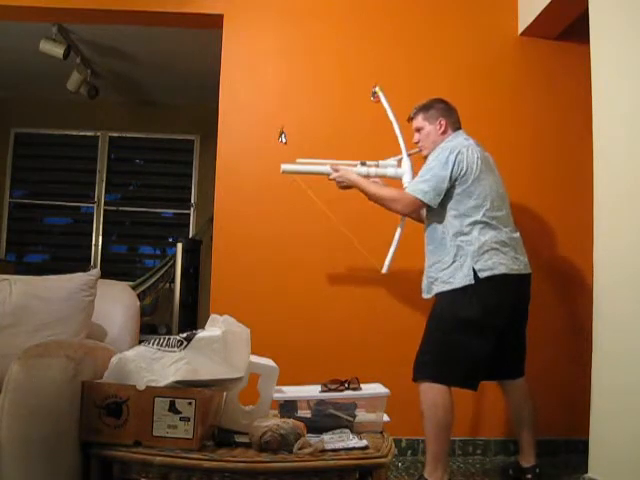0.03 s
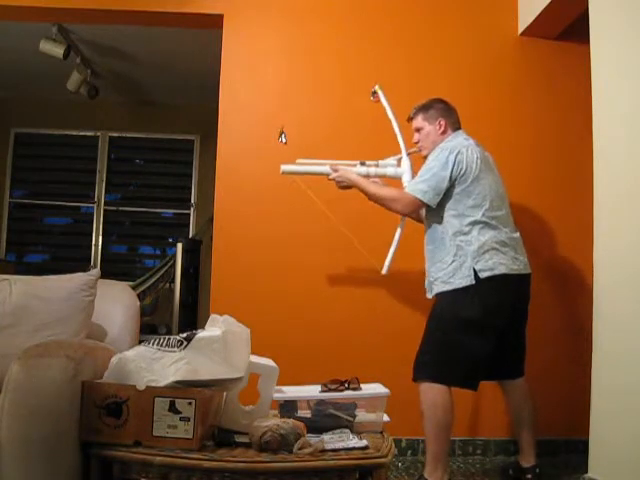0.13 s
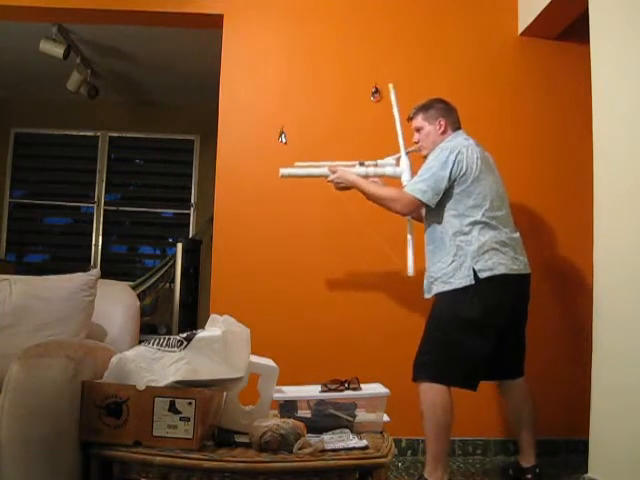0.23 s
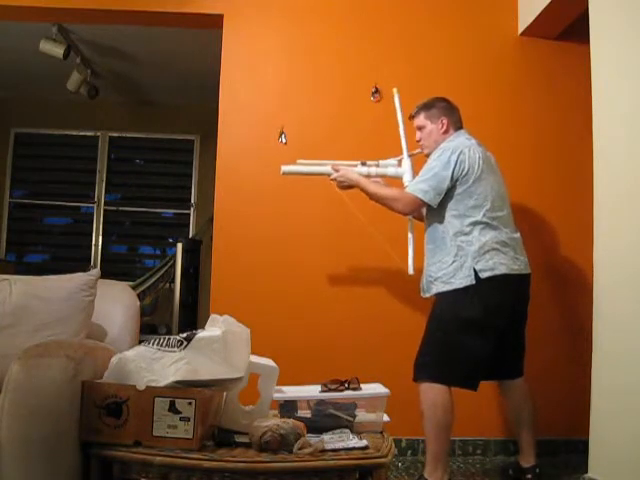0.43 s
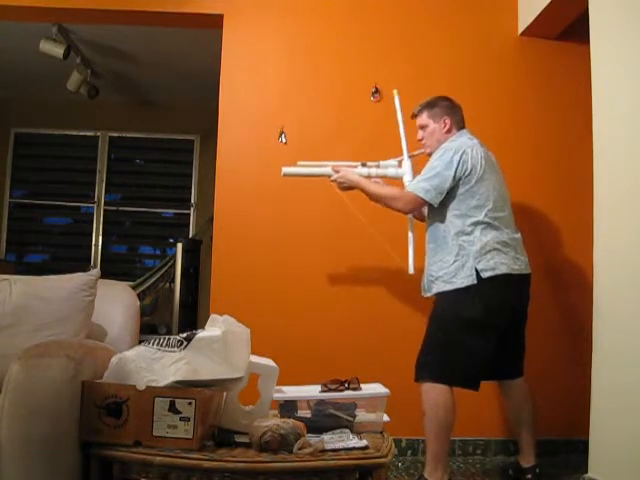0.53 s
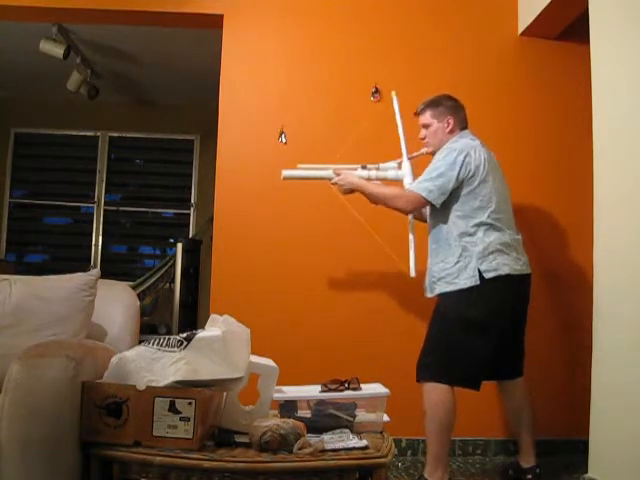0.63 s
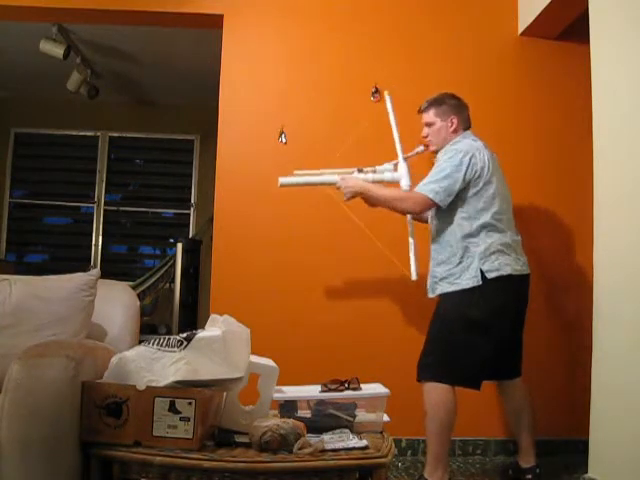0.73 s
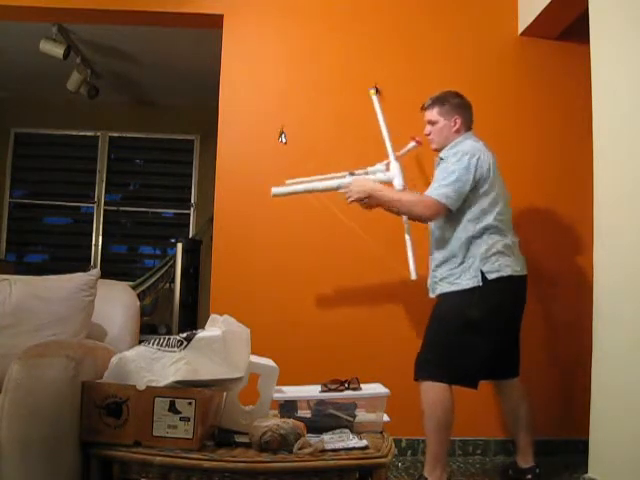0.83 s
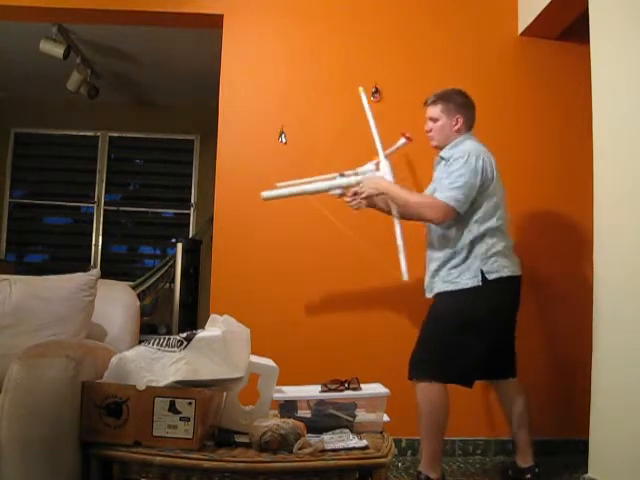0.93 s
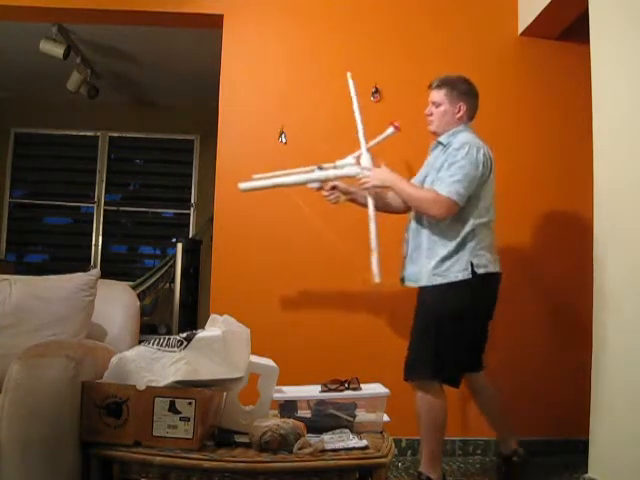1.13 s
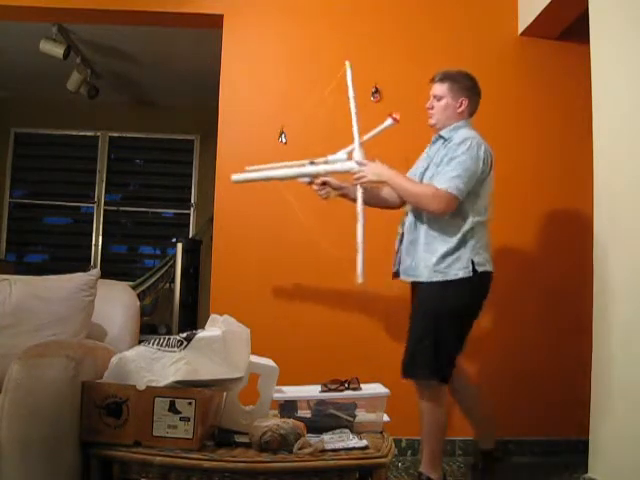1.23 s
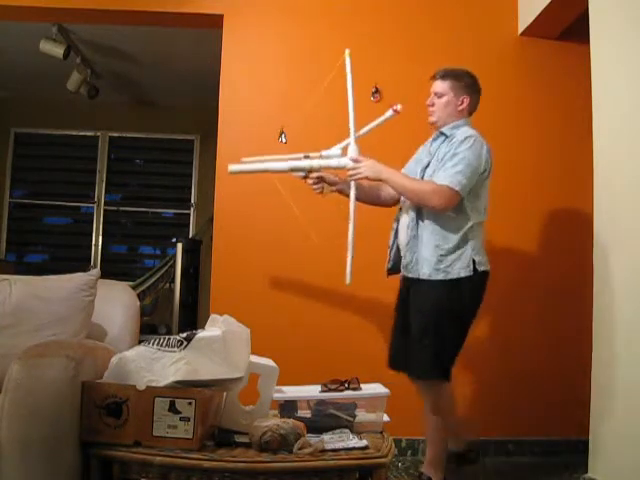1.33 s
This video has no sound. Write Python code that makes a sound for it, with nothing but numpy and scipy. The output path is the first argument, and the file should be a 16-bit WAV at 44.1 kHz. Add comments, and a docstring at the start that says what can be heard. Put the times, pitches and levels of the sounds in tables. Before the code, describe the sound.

A home-made plastic-pipe crossbow creaks, then fires with a loud snapping thump. The dart cracks against a nearby surface and drops with light taps, and sleeves rustle faintly in a slightly echoing living room.

```python
"""A short creak comes first, as a finger squeezes the trigger of a home-made plastic-pipe crossbow.
The catch lets go, the bow's limbs thump the air, and the plunger slams home and rings the frame.
The dart cracks against a nearby surface in the hard-walled living room, then drops with light taps.
Sleeves rustle as the bow is lowered. The recorder turns itself down at the shot and creeps back up
over a low hum and a thin whine."""
import sys
import numpy as np
from scipy import signal
from scipy.fft import rfft, irfft
from scipy.io import wavfile
from scipy.ndimage import uniform_filter1d

SR = 44100
rng = np.random.default_rng(int(sys.argv[2]) if len(sys.argv) > 2 else 0)


def int16_out(signal):
    """Quantize to a 16-bit WAV file."""
    q = np.round(np.clip(np.atleast_2d(signal).T, -1, 1) * 32767)
    wavfile.write(sys.argv[1], SR, q.astype(np.int16))


N = 61739
TIME = np.arange(N) / SR


def gain(db):
    """Turn decibels into a multiplier."""
    return 10 ** (np.asarray(db) / 20)


def unit(x):
    """Scale a sound to an average (rms) level of 1."""
    return x / np.sqrt(np.mean(x ** 2))


def with_energy(x, db):
    """Give a short sound the energy of 0.01 seconds of steady sound at db."""
    return x * gain(db) * np.sqrt(.01 * SR / np.sum(x ** 2))


def fade(start, fade_s):
    """Die away from a start time. A fade time is how long it takes to drop 60 dB."""
    age = TIME - start
    return (age >= 0) * np.exp(-np.log(1000) * np.maximum(age, 0) / fade_s)


def ring(start, hz, fade_s):
    """One fading note."""
    return fade(start, fade_s) * np.sin(2 * np.pi * hz * (TIME - start))


def wobble(samples):
    """A random wander, slower when smoothed over more samples."""
    return unit(uniform_filter1d(rng.standard_normal(N), size=samples))


def at_hz(hz, table):
    """Read between the rows of a table of frequencies and values."""
    freqs, values = np.array(table, float).T
    return np.interp(np.log(hz + 1), np.log(freqs), values)


def shape_tone(x, tone):
    """Make some frequencies louder and others softer, following a tone table."""
    hz = np.arange(N + 1) * SR / (2 * N)
    cepstrum = irfft(np.log(gain(at_hz(hz, tone))))
    cepstrum[1:N] *= 2
    cepstrum[N + 1:] = 0  # so the filter rings only after a hit, never before
    return irfft(rfft(x, 2 * N) * np.exp(rfft(cepstrum)))[:N]


# How long the room rings. Each row: frequency in Hz, fade time in seconds.
ROOM_FADES = [(100, .25), (250, 0.37), (550, 0.52), (1400, 0.62), (3500, 0.67), (8000, 0.51), (14000, .43)]
def room_tail(start, build_s=0.0039, bands=16):
    """Wall echoes blur into a wash of noise, each frequency band fading at its own rate."""
    hz = np.arange(N // 2 + 1) * SR / N
    centres = np.geomspace(ROOM_FADES[0][0], ROOM_FADES[-1][0], bands)
    noise = np.exp(2j * np.pi * rng.random(len(hz)))
    tail = 0
    for centre, share in zip(centres, np.eye(bands)):
        band = irfft(noise * np.interp(hz, centres, share), N)
        tail += band * fade(start, at_hz(centre, ROOM_FADES))
    return tail * (1 - np.exp(-np.maximum(TIME - start, 0) / build_s))


def contact(start, db, fade_s, room_db):
    """One hit: a burst of noise and the room's answer, which builds more slowly for a longer burst."""
    burst = rng.standard_normal(N) * fade(start, fade_s)
    tail = room_tail(start, build_s=0.0039 + fade_s / np.log(1000))
    return with_energy(burst, db) + with_energy(tail, db + room_db)


def knocks(rows, tone, room_db):
    """Hits take on the tone of the part that is struck, keeping their energy."""
    hits = sum(contact(start, db, fade_s, room_db) for start, db, fade_s in rows)
    return unit(shape_tone(hits, tone)) * np.std(hits)


# Tiny knocks in the frame. Each row: start in seconds, level in dB, fade time in seconds.
CREAK_HITS = [(0.0, -34.5, .15), (0.0235, -36.5, 0.073), (0.0295, -34, 0.049), (0.047, -39.5, 0.085)]
# Their tone. Each row: frequency in Hz, boost or cut in dB.
CREAK_TONE = [(120, -53.5), (200, -21), (397, -8.5), (512, -35.5), (696, -6), (833, -3.5), (998, -11),
              (1200, -1.5), (1950, -9.5), (2130, -11.5), (2850, -8), (5450, -7), (15000, -28)]
def creak():
    """The drawn frame creaks under the trigger finger."""
    return knocks(CREAK_HITS, CREAK_TONE, room_db=-2.5)


# The tone of the room's air. Each row: frequency in Hz, boost or cut in dB.
AIR_TONE = [(15, -32.5), (25, -4), (305, -9.5), (368, -6.5), (523, -12.5), (582, -9), (782, -15.5),
            (1140, -16.5), (3340, -27.5), (4870, -24), (5280, -33.5), (15500, -41.5)]
def air_and_hum(air_db=-54.5, hum_hz=59, hum_db=-61):
    """Soft room noise and mains hum go on throughout."""
    air = unit(shape_tone(rng.standard_normal(N), AIR_TONE))
    return gain(air_db) * air + gain(hum_db) * np.sin(2 * np.pi * hum_hz * TIME)


# Small taps. Each row: start in seconds, level in dB, pitch in Hz, half the filter's width in Hz,
# fade time in seconds.
TAPS = [(0.0241, -41.5, 740, 183, 0.017), (0.571, -45, 614, 300, .03), (0.678, -34.5, 927, 496, 0.094),
        (0.681, -36.5, 3950, 1650, 0.028), (0.684, -43, 367, 248, 0.17), (0.693, -43.5, 8600, 1990, 0.015),
        (0.714, -41.5, 1280, 1220, 0.071), (0.787, -52, 11040, 1200, 0.037),
        (0.9658, -47.5, 6800, 3660, 0.0025)]
def light_taps():
    """The trigger, and later the dropping dart and loose parts, tap with a rough pitch each."""
    taps = 0
    for start, db, hz, half_width, fade_s in TAPS:
        tap = contact(start, db, fade_s, room_db=0.5)
        b, a = signal.iirpeak(hz, hz / (2 * half_width), fs=SR)
        pitched = signal.lfilter(b, a, signal.lfilter(b, a, tap))
        taps += unit(pitched) * np.std(tap)
    return taps


# When the whine sounds. Each row: start in seconds, length in seconds, level in dB.
WHINE_SPELLS = [(0.029, 0.14, -57), (1.27, 0.2, -64)]
def whine(hz=4770, waver_hz=37.4, edge_s=0.016):
    """A thin, high, wavering note, perhaps an insect outside."""
    loudness = 0
    for start, length, db in WHINE_SPELLS:
        inside_s = np.minimum(TIME - start, start + length - TIME)
        loudness += gain(db) * np.clip(inside_s / edge_s, 0, 1)
    pitch = hz + waver_hz * wobble(200)
    return loudness * unit(np.sin(2 * np.pi * np.cumsum(pitch) / SR))


# The catch and the scrape. Each row: start in seconds, level in dB, fade time in seconds.
CATCH_HITS = [(0.2298, -7, 0.15), (0.234, -6.5, 0.092), (0.2475, -9, 0.12)]
# Their tone. Each row: frequency in Hz, boost or cut in dB.
CATCH_TONE = [(59, -32), (100, -3.5), (898, -19), (1210, -6.5), (2040, 3), (2370, -9), (3180, -0.5),
              (4560, -8.5), (6950, -3), (13700, -19), (15500, -35)]
def catch_release():
    """The catch lets go and the plunger scrapes down the tube."""
    return knocks(CATCH_HITS, CATCH_TONE, room_db=-3.5)


# The thump's deep tone. Each row: frequency in Hz, boost or cut in dB.
THUMP_TONE = [(25, -25.5), (65, 4.5), (140, 0), (190, -12), (270, 0.5), (600, -7.5), (850, 1), (1400, -27),
              (5000, -55)]
def limb_thump(start=.24, db=-10, fade_s=0.11):
    """The bow's limbs spring straight and shove the air."""
    return knocks([(start, db, fade_s)], THUMP_TONE, room_db=-3)


# The notes of bow and barrel, plus one low note that lingers in the room.
# Each row: pitch in Hz, level in dB, fade time in seconds.
JOLT_NOTES = [(65.5, -23, 0.17), (269.3, -12.5, 0.23), (277.5, -33.5, 0.85), (372.6, -16, 0.093),
              (422, -4, 0.086), (583.5, -13, 0.13), (758.6, -10.5, 0.17), (884, -10.5, 0.21),
              (913, -12, .28), (1380, -18.5, 0.27), (2073, -4.5, 0.13), (2975, -12.5, 0.43),
              (3820, -10, 0.277), (7270, -17, .22)]
def jolt_ring(start, rise_s=.007):
    """A jolt rings the frame and one low note of the room; all swell quickly, slightly out of step."""
    rise = np.clip((TIME - start) / rise_s, 0, 1)
    notes = sum(gain(db) * ring(start + rng.random() / hz, hz, fade_s) for hz, db, fade_s in JOLT_NOTES)
    return rise * notes


# The plunger's hits. Each row: start in seconds, level in dB, fade time in seconds.
PLUNGER_HITS = [(0.2512, -6, .028), (0.253, -7.5, 0.003), (0.2553, -2.5, .02), (0.262, -6.5, .025)]
# Their tone. Each row: frequency in Hz, boost or cut in dB.
PLUNGER_TONE = [(88, -44.5), (150, -24), (428, -12.5), (643, -17), (912, -3.5), (985, -14), (1270, -2),
                (1630, -9), (2920, -3.5), (7270, -10), (15500, -21.5)]
def plunger_slam():
    """The plunger hits its stop and chatters."""
    return knocks(PLUNGER_HITS, PLUNGER_TONE, room_db=-3.5)


# The very short rings in the crack. Each row: pitch in Hz, level in dB, fade time in seconds.
CRACK_NOTES = [(2323, 16, 0.0026), (3440, 13.5, 0.002), (8720, 13, .003), (13000, -2, .002)]
# Echoes off nearby surfaces. Each row: delay in seconds, level in dB compared with the crack.
CRACK_ECHOES = [(.0034, -13), (.0063, -5.5), (.0087, -14.5), (.011, -10.5), (0.0402, -17)]
# The tone of the room's answer. Each row: frequency in Hz, boost or cut in dB.
CRACK_ROOM_TONE = [(200, -34), (500, -25), (850, -11.5), (1100, -6), (2000, -0.5), (2800, 1.5),
                   (4000, -6.5), (5200, -24), (5800, -22), (6400, -5.5), (7300, -18.5), (8100, -5.5),
                   (9200, -7.5), (11000, -19.5), (15500, -37)]
def dart_crack(start=.3083, low_cut_hz=900, room_db=-0.5):
    """The dart strikes with one sharp crack without bass, and the room throws it back."""
    crack = sum(gain(db) * ring(start, hz, fade_s) for hz, db, fade_s in CRACK_NOTES)
    crack = signal.sosfilt(signal.butter(2, low_cut_hz, "high", fs=SR, output="sos"), crack)
    echoes = sum(gain(db) * np.interp(TIME - delay, TIME, crack) for delay, db in CRACK_ECHOES)
    tail = shape_tone(room_tail(start), CRACK_ROOM_TONE)
    return crack + echoes + with_energy(tail, room_db)


# The rustle's rise and fall. Each row: time in seconds, level in dB.
RUSTLE_LEVELS = [(0.864, -58.5), (0.889, -46.5), (0.945, -46.5), (0.974, -44), (1.002, -54), (1.06, -57),
                 (1.162, -61.5), (1.219, -69), (1.4, -67)]
# Its tone. Each row: frequency in Hz, boost or cut in dB.
RUSTLE_TONE = [(200, -17), (500, -9.5), (900, -7), (1400, -8), (2100, -1.5), (5400, -4), (9000, -10.5),
               (12000, -20), (15500, -24.5)]
def sleeve_rustle(grain_db=2, room_db=-4.5):
    """Cloth and hands rub on the pipe, faintly at first, swelling as the bow is lowered."""
    grains = gain(grain_db * wobble(90))
    loudness = gain(np.interp(TIME, *np.array(RUSTLE_LEVELS).T))
    rub = loudness * unit(shape_tone(grains * rng.standard_normal(N), RUSTLE_TONE))
    room = unit(room_tail(0)) / np.sqrt(N)
    return rub + gain(room_db) * signal.fftconvolve(rub, room)[:N]


def scene():
    """All the sounds add up at one microphone."""
    crossbow = creak() + catch_release() + plunger_slam() + limb_thump() + jolt_ring(start=.249)
    rebound = gain(-10.5) * jolt_ring(start=.281)  # the limbs bounce back with a second jolt
    mix = crossbow + rebound + dart_crack() + light_taps() + sleeve_rustle() + whine() + air_and_hum()
    return mix[None]


def record(dry):
    """Loud sound turns the gain down at once and it recovers slowly; peaks clip and the top is cut."""
    threshold_db, deepest_dip_db, recover_db_per_s, top_hz = -26.5, 13.5, 12, 15700
    power = np.abs(uniform_filter1d(dry[0] ** 2, size=64))
    level_db = 10 * np.log10(power + np.finfo(float).eps)
    wanted_dip_db = np.clip(level_db - threshold_db, 0, deepest_dip_db)
    recovery_db = recover_db_per_s * TIME
    dip_db = np.maximum.accumulate(wanted_dip_db + recovery_db) - recovery_db
    clipped = np.clip(dry * gain(-dip_db), -1, 1)
    return signal.sosfilt(signal.ellip(10, .2, 70, top_hz, fs=SR, output="sos"), clipped)


dry = scene()
out = record(dry)
int16_out(out)
```